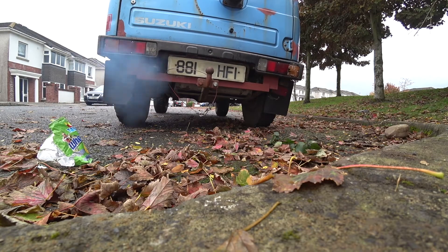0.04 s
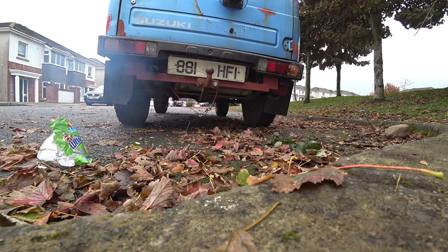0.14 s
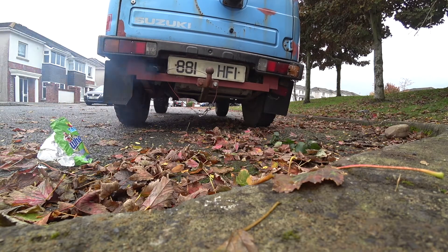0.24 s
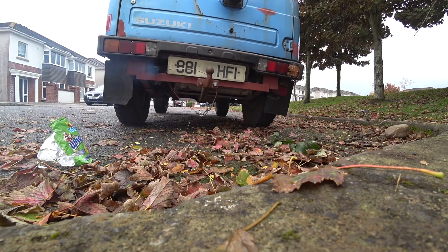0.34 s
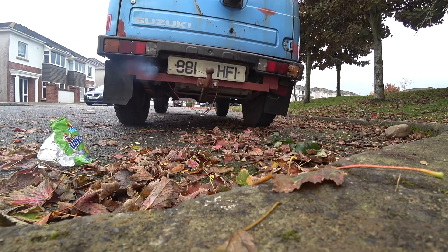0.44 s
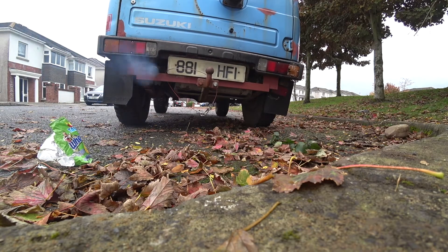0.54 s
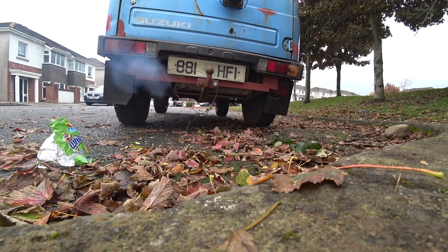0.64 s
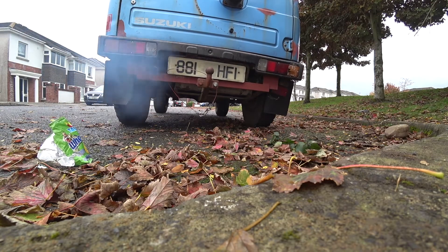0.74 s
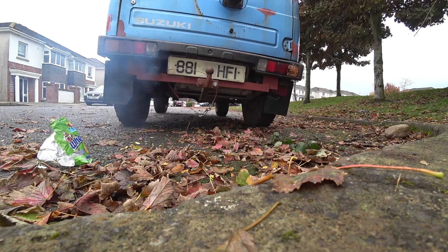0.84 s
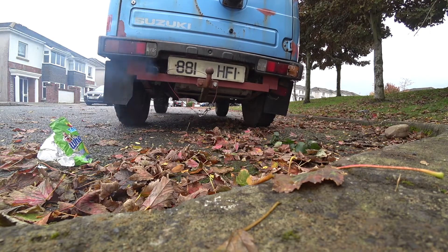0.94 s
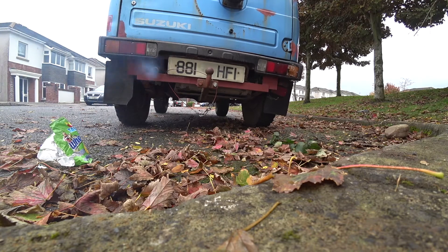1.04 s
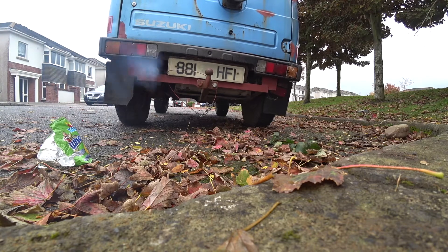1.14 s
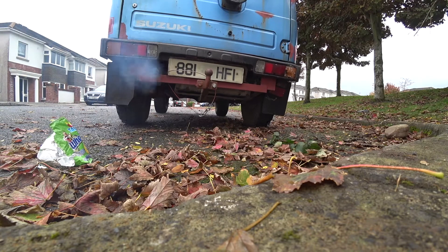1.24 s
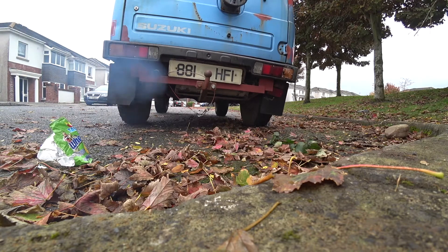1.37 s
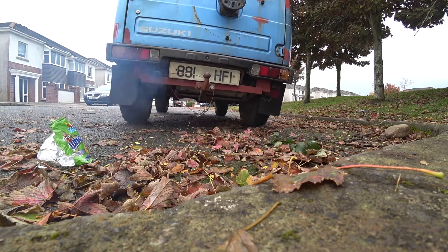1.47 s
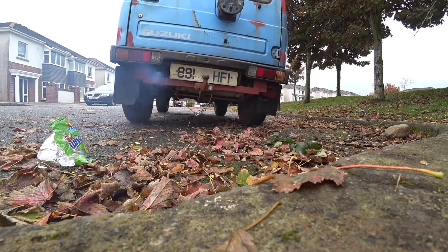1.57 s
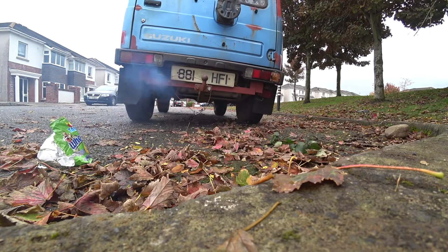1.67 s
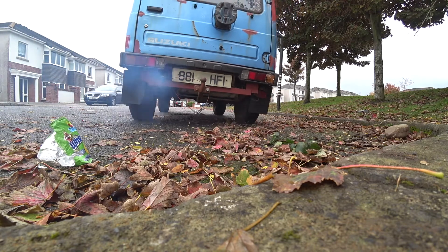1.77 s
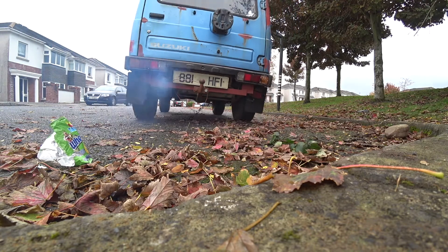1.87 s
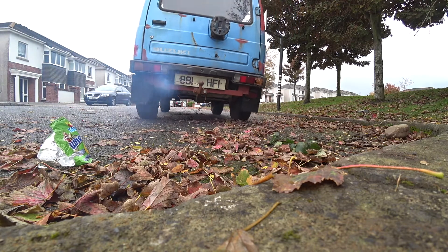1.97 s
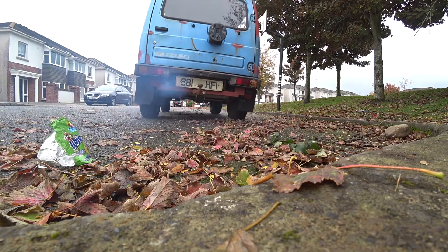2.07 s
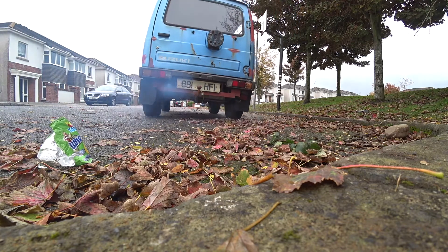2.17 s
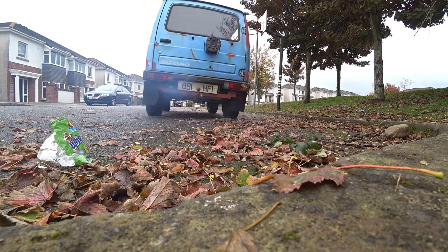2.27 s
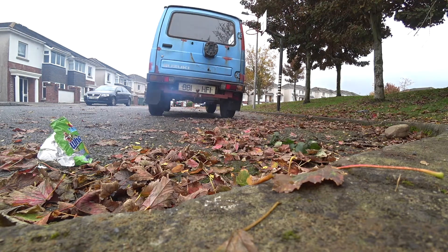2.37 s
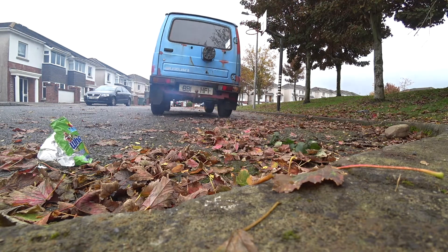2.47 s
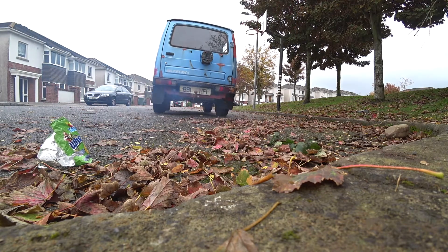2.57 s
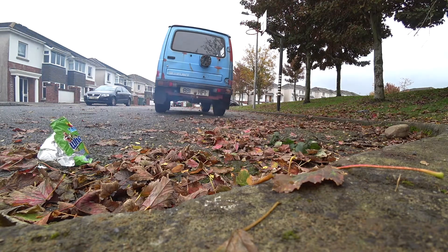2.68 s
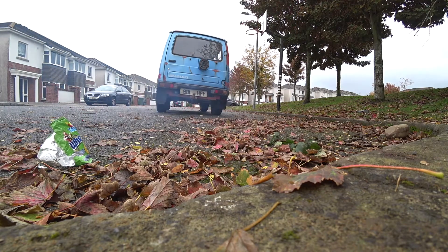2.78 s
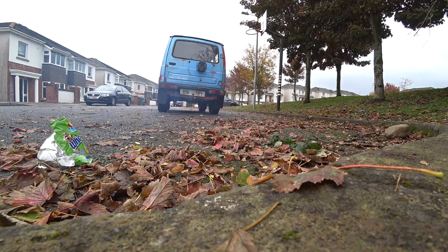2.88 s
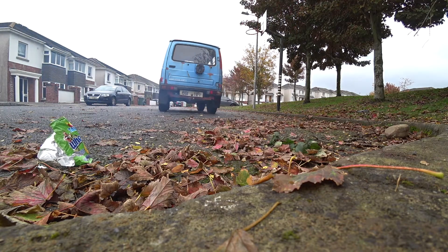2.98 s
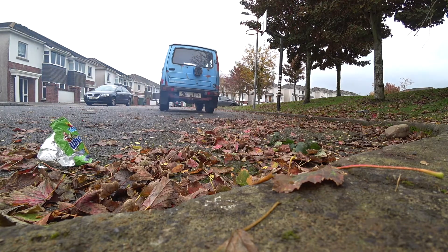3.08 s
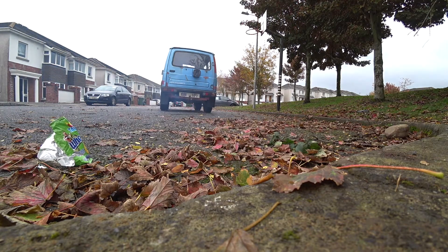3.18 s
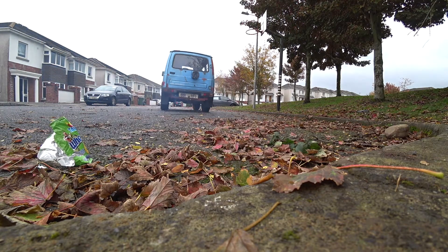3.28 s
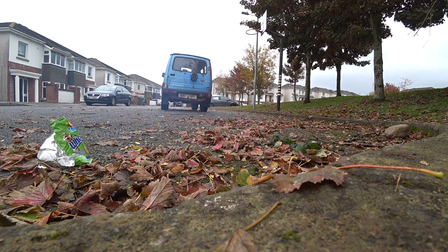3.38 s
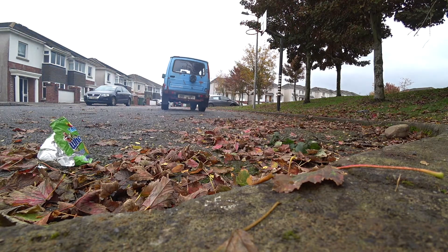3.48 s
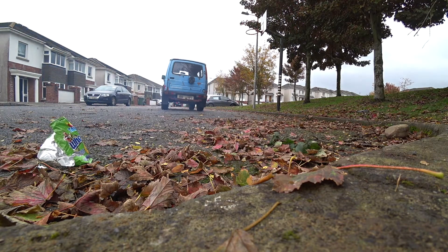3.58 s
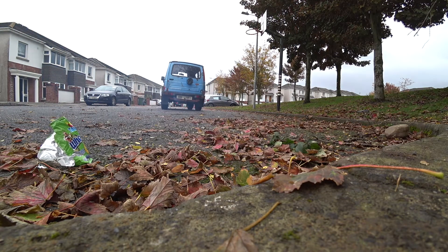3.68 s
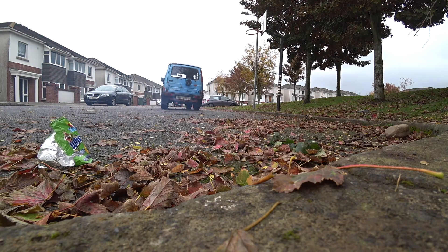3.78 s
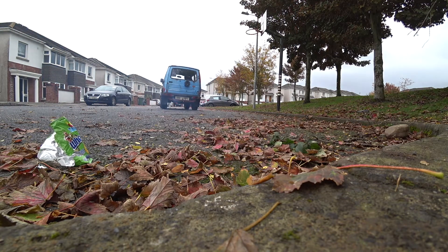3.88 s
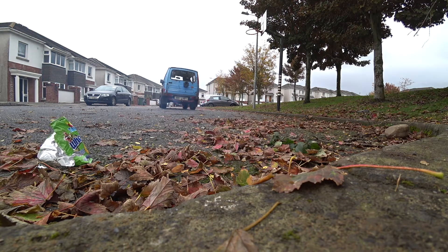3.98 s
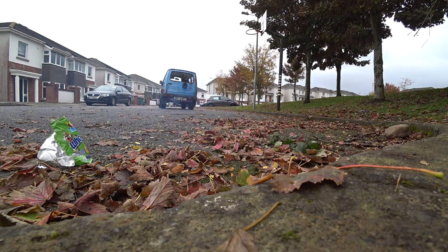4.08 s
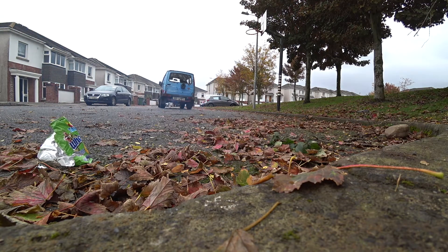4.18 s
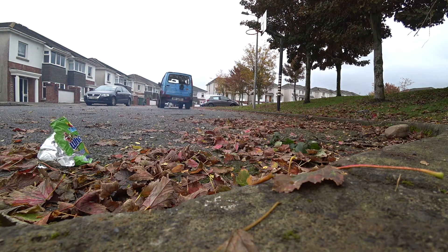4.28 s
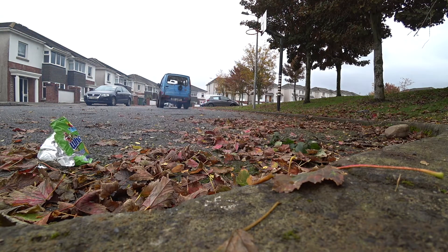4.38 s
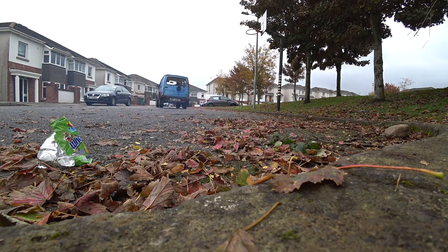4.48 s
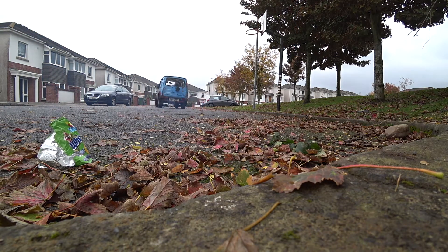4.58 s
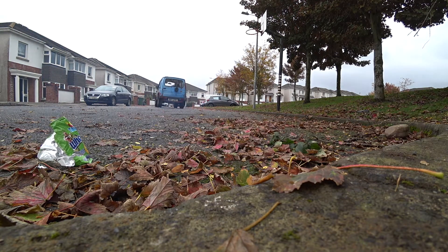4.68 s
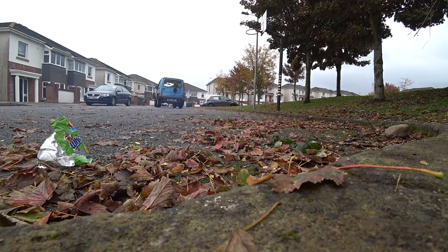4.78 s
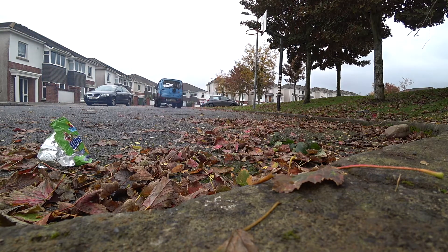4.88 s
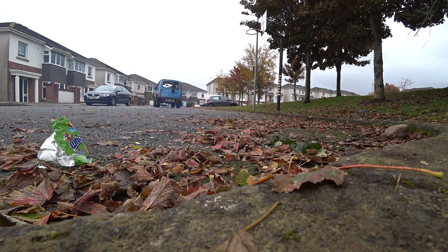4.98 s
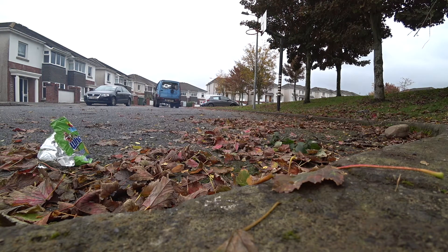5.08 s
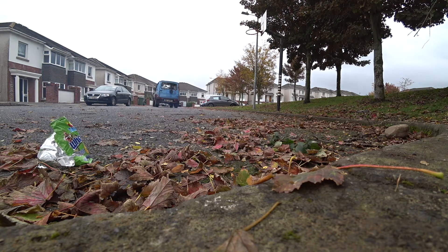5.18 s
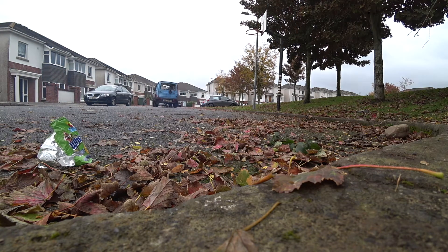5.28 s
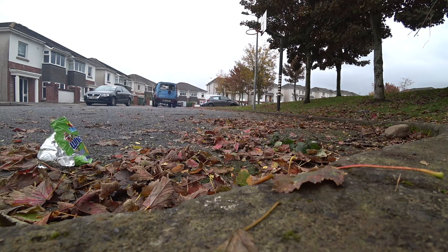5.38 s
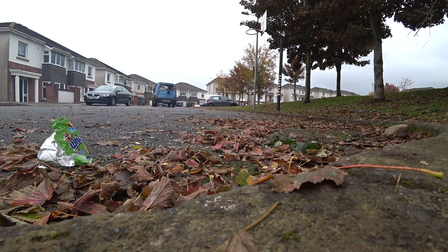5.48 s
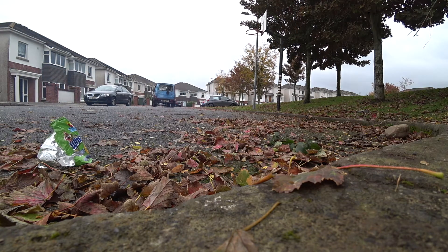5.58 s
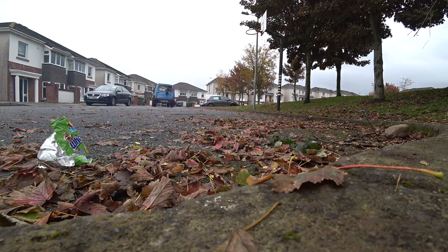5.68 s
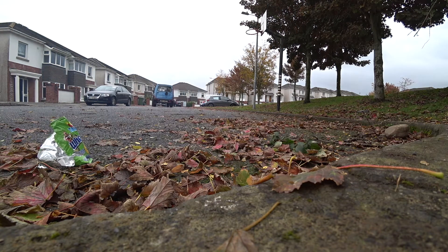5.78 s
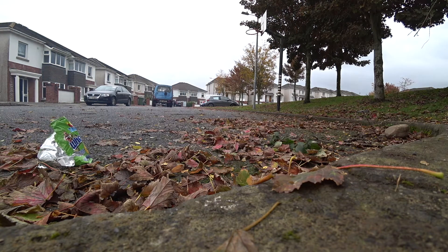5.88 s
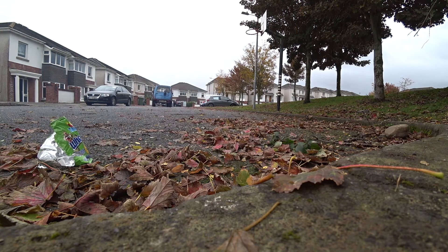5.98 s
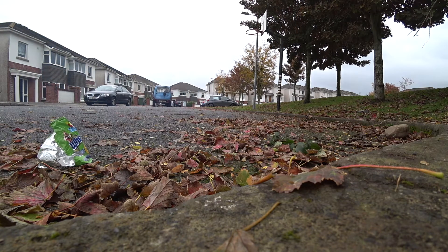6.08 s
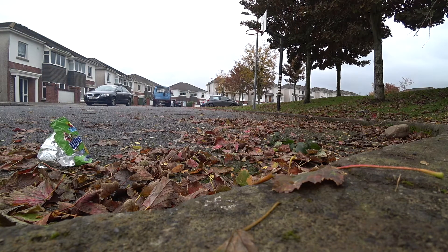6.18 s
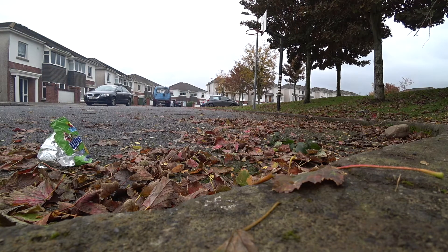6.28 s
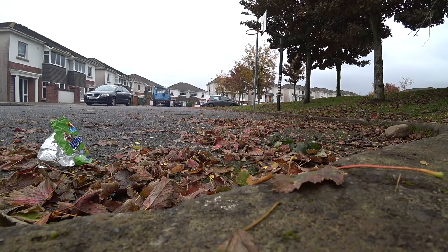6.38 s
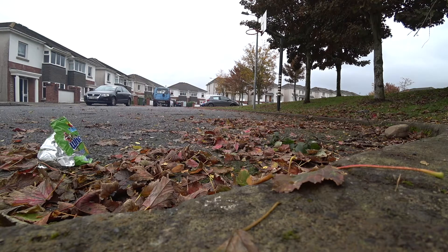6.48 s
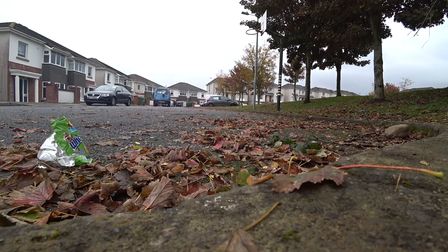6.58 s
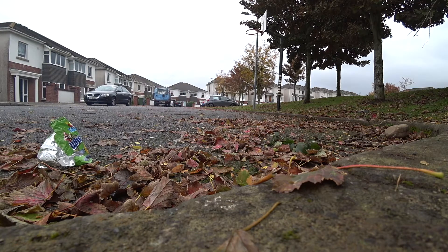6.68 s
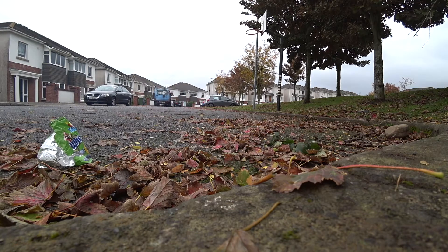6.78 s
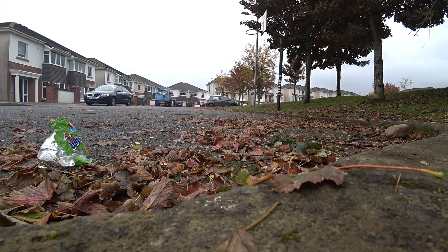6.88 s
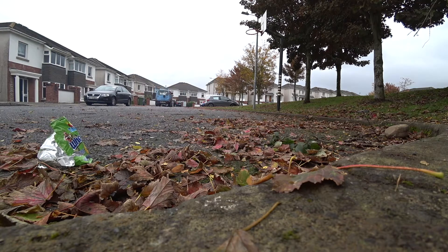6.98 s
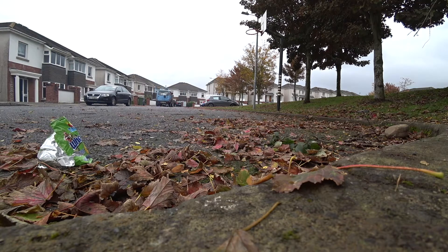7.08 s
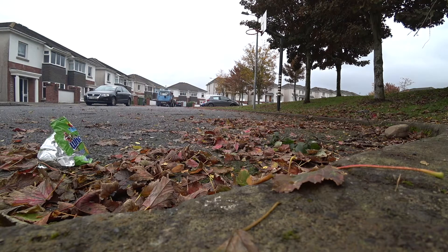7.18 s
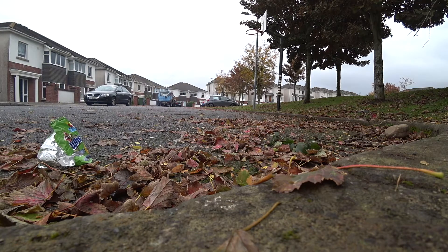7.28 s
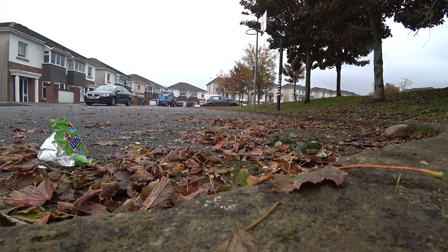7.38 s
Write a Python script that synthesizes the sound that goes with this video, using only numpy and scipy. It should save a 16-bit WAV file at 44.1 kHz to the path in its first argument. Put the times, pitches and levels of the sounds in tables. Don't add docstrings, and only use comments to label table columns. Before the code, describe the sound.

A rough little petrol engine throbs right in front of the microphone, revving in short bursts with gassy hiss and a light knock. Loose metal ticks and dry leaves crackle as it moves off. The sound quickly dulls with distance, pitch rises to a buzzy peak, falls at the shift, then hums away quietly with faint tyre hiss. Open street, low rumble, wind on the microphone.

```python
import sys
import numpy as np
from scipy import signal
from scipy.fft import rfft, irfft, next_fast_len
from scipy.io import wavfile
from scipy.ndimage import uniform_filter1d

SR = 44100
rng = np.random.default_rng(int(sys.argv[2]) if len(sys.argv) > 2 else 0)


def master(y):
    cut = np.clip(np.atleast_2d(y).T, -1, 1)
    pcm = np.round(cut * 32767)
    wavfile.write(sys.argv[1], SR, pcm.astype(np.int16))


def field_ratio(decibels):
    return 10 ** (np.asarray(decibels, dtype=float) / 20)


N = 328104

# pitch_hz, level_db (per Hz)
STREET_COLOUR = [(35, -17), (55, 12), (90, 10), (125, 12.5), (152, -4), (190, -34), (280, -6.5), (350, 0.5),
                 (500, -13), (900, -52.5)]
STREET_DB = -36.5

# start_s, end_s, level_db
GUSTS = [
    (0, .02, -28),
    (.28, .3, -37),
    (.8, .9, -42),
    (1.3, 1.8, -45),
    (2.46, 2.5, -40),
    (3.1, 3.2, -47),
    (3.7, 3.8, -46),
    (4.3, 4.35, -44),
    (5.2, 5.26, -38),
    (6.13, 7.44, -48),
]
GUST_DB_PER_S, CALM_DB = 70, -56
# pitch_hz, level_db (per Hz)
GUST_COLOUR = [(8, -33), (16, -2), (38, 20), (60, 3), (200, -47.0)]

# pitch_hz, leading_share, in_phase_share, unrelated_share
PORTS = [(60, 0.27, 0.073, .05), (150, 0.42, 0.089, 0.11), (350, 0.53, 0.14, 1), (790, 0.51, 0.077, 0.41),
         (1190, 0.22, 0.18, 0.39), (2500, 0.27, 0.074, 0.38), (5000, .12, 0.037, 0.32),
         (10000, .13, 0.016, 0.34)]
FULL_WIDTH_DB = -14

# start_s, peak_db
LEAVES = [
    (2.114, -26.5),
    (2.2692, -29),
    (2.458, -41),
    (2.4803, -24.5),
    (7.0544, -43),
]
# start_s, peak_db, pitch_hz
RATTLE = [(1.9928, -28, 4370), (2.055, -31, 3400), (2.0841, -26, 4100), (2.1016, -36, 3300),
          (2.1188, -24, 4460), (2.1817, -23, 4100), (2.2118, -31, 4590), (2.2303, -24.5, 4400),
          (2.296, -27, 4640), (2.365, -37, 4330), (2.6528, -31, 4140)]

# time_s, firing_hz
SPEED = [(0, 73.5), (.3, 77.3), (.6, 71), (1.3, 73.8), (1.78, 75.3), (2.04, 64.2), (2.3, 59.8),
         (2.785, 55.6), (3.0, 60.8), (3.33, 63.6), (3.6, 75), (4.2, 81.8), (5.1, 66.5), (5.44, 44.5),
         (5.75, 50), (6.3, 54), (7.1, 55.2), (7.44, 60)]
# peak_s, extra_hz, rise_s, fall_s
FLARES = [
    (.104, 13, .1, .045),
    (.754, 14, .14, .17),
    (.756, 4.5, .06, .015),
    (1.087, 4, .1, .1),
    (1.56, 3.4, .22, .2),
    (2.54, 1.5, .2, .1),
    (4.158, 6, .33, .04),
    (5.6, -1.5, .14, .03),
    (6.75, -1.3, .35, .12),
    (7.24, 1.6, .1, .12),
]
# start_s, end_s
OPEN = [
    (-1, .115),
    (.615, .765),
    (1.0, 4.15),
    (5.41, 9),
]
PEDAL_S = .04
GULP_DB, GULP_S = 5, 0.027
# time_s, gas_flow_db, pulse_strength_db, pulse_sharpness_db
FLOW = [(0, -26, -15.5, -4), (0.8, -27.0, -16, -8), (1.3, -27.0, -16.5, 1), (1.5, -26.0, -16.5, 7.2),
        (1.9, -28, -15.5, 0.5), (2.45, -27.5, -17.5, 2), (2.76, -31, -21, 11), (3, -30.5, -22, 0.5),
        (3.3, -29, -21, 3.8), (3.5, -26, -15.5, -1), (4.05, -28.5, -17, 1), (4.25, -32, -22.5, -17),
        (5.1, -35, -23, -6), (5.2, -35.5, -33.8, 6), (5.55, -38.5, -27.5, -21), (5.75, -33, -22.5, 4),
        (7, -33.5, -28, 10.5), (7.44, -31.5, -22, 0.5)]

# pitch_hz, level_db (per Hz)
HISS_COLOUR = [(880, -38), (1500, 0), (2210, -4.5), (2730, -7.5), (3280, -3), (3780, -1.5), (4260, -1.5),
               (5250, -4.5), (6270, -2.5), (7420, -4.5), (8560, -12), (10600, -11.5), (11200, -30),
               (14600, -52), (22000, -120)]
HISS_DB = -11.5
HISS_EDGES_HZ = [300, 2800, 5300, 7800, 14000]
DULLING = [-0.11, 0.14, 0.22, 0.81]
# time_s, level_db
CLEAR = [(0, 4), (2.55, 3.5), (3.2, -24), (3.5, -15), (4.2, -14), (5.6, -11), (6.3, -9.5), (6.9, -10),
         (7.44, -10)]
ROAD_FROM_S, ROAD_DB_PER_S = 6.77, 6

# pitch_hz, level_db (per Hz)
ROAR_COLOUR = [(700, -10.5), (1080, 5.0), (1200, 6.5), (1350, 0.5), (2000, -18)]
ROAR_LOADED_DB, ROAR_OVERRUN_DB = -12, -15

# start_s, end_s, level_db
RASP = [
    (3.6, 4.08, -45),
]
RASP_DB_PER_S, RASP_REST_DB = 33, -70
# pitch_hz, level_db (per Hz)
RASP_COLOUR = [(1000, -33), (1400, -3), (2000, -1), (2600, -24)]

# pitch_hz, level_db (per Hz)
RUMBLE_COLOUR = [(26, -48), (45, -8), (86, -4), (122, -67), (153, 10.5), (214, -12.5), (259, -3),
                 (395, -10.5), (692, -9), (753, -16.5), (863, -11), (1060, -22), (2600, -29), (3380, -48),
                 (5720, -120)]

# pitch_hz, level_db, t60_s
BLOCK = [(2120, -1, .02), (2280, 0, .025), (3280, -10, .015), (4230, -4, .04), (4400, -11, .02)]
# start_s, end_s, level_db
KNOCKS = [
    (0, .1, -39),
    (.63, .74, -38),
    (1.3, 1.72, -41),
    (3.42, 4.08, -48),
]
KNOCK_REST_DB, KNOCK_DB_PER_S = -58, 300

# pitch_hz, width_hz, level_db
PIPE = [(356, 21, -13), (429, 70, -9.5), (519, 41, -11.5), (599.5, 28.4, -10), (701.6, 19, -12.5),
        (790, 63, -14.5), (878, 78, -16.5)]
UPPER_LOADED_DB, UPPER_OVERRUN_DB = -3, 0
UPPER_SHARE, GULP_SHARPENS = 0.2, 4.4
BRIGHTER_DB_PER_HZ, BRIGHTER_FROM_HZ = .3, 63

# pitch_hz, width_hz, level_db
LOW_PIPE = [(83.6, 21.9, -2.5), (110.9, 17.6, -5.5), (158.7, 21.5, 0.26), (275.7, 56, -8.0), (393, 92, -14)]
LOW_CUT_HZ, OVERRUN_CUT_HZ, LOW_CUT_SLOPE = 58.7, 52, 29
# pitch_hz, width_hz
NOTCHES = [(219.4, 23), (315.0, 50)]
ORDER_PHASE = [0.0, 0.3, 0.8, 2.0, 4.0]
ORDER_LOADED_DB = [1.3, -0.96, -0.87, -3, -9.5]
ORDER_OVERRUN_DB = [1.9, -5.5, -1.5, -7.5, -11]
ORDER_DB_PER_S = [.1, 0.32, -0.12, -0.74, 0.57]
LEAVES_AT_S = 1.8
SHARP_SHARE = [0, 0, 0.44, 0.5, 0.79]
# centre_s, level_db, spread_s
STUMBLES = [(.17, 2, 0.035), (.23, -8, 0.0099), (.33, 0, 0.018), (.55, 1, 0.027), (.8, 2, .03),
            (.88, -2.5, 0.024), (4.15, -4, 0.017), (4.79, -4.5, 0.038), (5.33, 1.5, 0.077),
            (5.64, 4.5, 0.031), (6.1, 1, .15)]


def seconds():
    return np.arange(N) / SR


def rms_one(x):
    return x / np.sqrt(np.mean(x ** 2) + 1e-20)


def in_time(rows):
    s, *columns = np.transpose(rows)
    return [np.interp(seconds(), s, c) for c in columns]


def at_hz(points, hz, column=1):
    points = np.array(points)
    return np.interp(np.log(hz), np.log(points[:, 0]), points[:, column])


def spans(rows, db_per_s, rest_db):
    t = seconds()
    levels = [np.full(N, rest_db)]
    for start, end, db in rows:
        outside = np.maximum(0, np.maximum(start - t, t - end))
        levels.append(db - db_per_s * outside)
    return np.max(levels, axis=0)


def drift(rate):
    r = np.exp(-80 * np.pi * rate / SR)
    slow = signal.lfilter([1], [1, -2 * r, r * r], rng.standard_normal(N // 40 + 2002))[2000:]
    return np.interp(np.arange(N) / 40, np.arange(len(slow)), rms_one(slow))


def ring(clicks, hz, t60):
    r, w = field_ratio(-60 / (t60 * SR)), 2 * np.pi * hz / SR
    return signal.lfilter([0, np.sin(w)], [1, -2 * r * np.cos(w), r * r], clicks + 1e-18)


def coloured(spectrum):
    size = next_fast_len(N)
    hz = np.maximum(np.fft.rfftfreq(size, 1 / SR), 1)
    shaped = rfft(rng.standard_normal((2, size))) * field_ratio(at_hz(spectrum, hz))
    return rms_one(irfft(shaped, size)[:, :N])


def street():
    return field_ratio(STREET_DB + 1.5 * drift(3.7)) * coloured(STREET_COLOUR)


def gusts():
    level_db = spans(GUSTS, GUST_DB_PER_S, CALM_DB) + 2.3 * drift(8)
    return field_ratio(level_db) * coloured(GUST_COLOUR)[0]


def ports(mid, diffuse):
    size = next_fast_len(N)
    hz = np.maximum(np.fft.rfftfreq(size, 1 / SR), 1)
    loudness = np.sqrt(uniform_filter1d(mid ** 2, size=6000)) / field_ratio(FULL_WIDTH_DB)
    width = loudness ** 1.16
    bass = np.clip(600 / hz, 0, 1) ** 3.3
    turned = rfft(mid, size) * (1j * at_hz(PORTS, hz) + at_hz(PORTS, hz, column=2))
    turned += rfft(diffuse, size) * at_hz(PORTS, hz, column=3)
    side = width * irfft(turned * bass, size)[:N] + irfft(turned * (1 - bass), size)[:N]
    return np.array([mid + side, mid - side])


def leaf_snaps():
    clicks = np.zeros(N)
    for s, db in LEAVES:
        clicks[round(s * SR)] = field_ratio(db + 5.0)
    dying = signal.lfilter([1], [1, -np.exp(-1 / (.005 * SR))], clicks)
    body = signal.butter(1, [900, 3800], "band", fs=SR, output="sos")
    return dying * signal.sosfilt(body, rng.standard_normal(N))


def shield_ticks():
    out = np.zeros(N)
    after = np.arange(800) / SR
    for s, db, hz in RATTLE:
        modes = hz * rng.uniform(.85, 1.13, (5, 1))
        cluster = np.sin(2 * np.pi * modes * after).sum(axis=0)
        out[round(s * SR):][:800] += field_ratio(db - 15 - 60 * after / 0.061) * cluster
    return out


def revs():
    t = seconds()
    rate = in_time(SPEED)[0]
    for s, hz, rise, fall in FLARES:
        rate = rate + hz * np.clip(1 + (t - s) / rise, 0, 1) * np.exp(-np.maximum(t - s, 0) / fall)
    return uniform_filter1d(rate, size=700)


def pedal():
    t = seconds()
    throttle, gulp_db = np.zeros(N), np.zeros(N)
    for start, end in OPEN:
        pressed = np.clip((t - start) / PEDAL_S + .5, 0, 1)
        throttle += pressed * np.clip((end - t) / PEDAL_S + .5, 0, 1)
    for start, _ in OPEN[:-1]:
        gulp_db += GULP_DB * (t >= start) * np.exp(-np.abs(t - max(start, 0)) / GULP_S)
    return throttle, uniform_filter1d(gulp_db, size=1000)


def by_load(throttle, loaded, overrun):
    return throttle * loaded + (1 - throttle) * overrun


def puffs(turn, depth_db, uneven_db):
    cycle, since = np.divmod(turn / (2 * np.pi), 1)
    chance = np.clip(rng.standard_normal(int(cycle[-1]) + 1), -2, 2)
    strength_db = depth_db + uneven_db * chance[cycle.astype(int)]
    return rms_one(field_ratio(uniform_filter1d(strength_db * np.exp(-3.0 * since), size=30)))


def hiss(turn, rumble_db):
    white = [coloured(HISS_COLOUR), coloured(HISS_COLOUR)]
    dull_db = in_time(CLEAR)[0]
    out = 0
    for k in range(4):
        band_pass = signal.butter(2, HISS_EDGES_HZ[k:k + 2], "band", fs=SR, output="sos")
        flicker_db = 1.0 * drift(16.6) + 0.32 * drift(0.96)
        out = out + signal.sosfilt(band_pass, white[k % 2]) * field_ratio(flicker_db + dull_db * DULLING[k])
    level_db = rumble_db + HISS_DB + ROAD_DB_PER_S * np.maximum(seconds() - ROAD_FROM_S, 0)
    return field_ratio(level_db) * puffs(turn, depth_db=5.0, uneven_db=1.5) * out


def roar(throttle, flow_db):
    return field_ratio(flow_db + by_load(throttle, ROAR_LOADED_DB, ROAR_OVERRUN_DB)) * coloured(ROAR_COLOUR)


def rasp(turn):
    level = field_ratio(spans(RASP, RASP_DB_PER_S, RASP_REST_DB))
    return level * coloured(RASP_COLOUR) * puffs(turn, depth_db=2.0, uneven_db=3.0)


def rumble(turn, rumble_db):
    level = field_ratio(rumble_db - 1.0 + 1.0 * drift(5.2))
    return level * coloured(RUMBLE_COLOUR) * puffs(turn, depth_db=-11.0, uneven_db=3.0)


def knock(turn):
    at = np.flatnonzero(np.diff((turn / (2 * np.pi) + .35).astype(int)))
    strength_db = -6 * (np.arange(len(at)) % 2) + rng.normal(0, 2.5, len(at))
    out = np.zeros(N)
    for hz, level_db, t60 in BLOCK:
        clicks = np.zeros(N)
        clicks[at] = field_ratio(level_db + strength_db + rng.normal(0, 2, len(at)))
        out += ring(clicks, hz, t60)
    return field_ratio(spans(KNOCKS, KNOCK_DB_PER_S, KNOCK_REST_DB)) * rms_one(out)


def upper_orders(turn, per_s, upper_db):
    out = np.zeros(N)
    for k in range(6, 17):
        gain = sum(field_ratio(db) / (1 + (2 * (k * per_s - hz) / width) ** 2) for hz, width, db in PIPE)
        phase = .15 * drift(4) + rng.uniform(0, 2 * np.pi)
        out += gain * field_ratio(upper_db + 1.2 * drift(4)) * np.cos(k * turn + phase)
    return out


def low_pipe(order_hz, throttle):
    gain = np.abs(sum(field_ratio(db) / (1 + 2j * (order_hz - hz) / width) for hz, width, db in LOW_PIPE))
    cut_hz = OVERRUN_CUT_HZ + throttle * (LOW_CUT_HZ - OVERRUN_CUT_HZ)
    gain = gain / np.sqrt(1 + (cut_hz / order_hz) ** LOW_CUT_SLOPE)
    for hz, width in NOTCHES:
        gain = gain * np.sqrt(1 - .97 / (1 + (2 * (order_hz - hz) / width) ** 2))
    return gain


def low_orders(turn, per_s, throttle, pulse_db, sharp_db):
    out, t = np.zeros(N), seconds()
    for s, db, spread in STUMBLES:
        pulse_db = pulse_db + db * np.exp(-((t - s) / spread) ** 2 / 2)
    away_s = np.maximum(t - LEAVES_AT_S, 0)
    for i in range(5):
        k = i + 1
        db = pulse_db + ORDER_DB_PER_S[i] * away_s + SHARP_SHARE[i] * sharp_db
        db = db + by_load(throttle, ORDER_LOADED_DB[i], ORDER_OVERRUN_DB[i])
        db = db + .45 * np.sqrt(k) * drift(10)
        phase = ORDER_PHASE[i] + np.pi * throttle * (i % 2)
        out += np.sqrt(2) * low_pipe(k * per_s, throttle) * field_ratio(db) * np.cos(k * turn + phase)
    return out


def scene():
    per_s = revs()
    throttle, gulp_db = pedal()
    flow_db, pulse_db, sharp_db = in_time(FLOW)
    turn = 2 * np.pi * np.cumsum(per_s) / SR
    rumble_db = flow_db + gulp_db
    brighter_db = throttle * BRIGHTER_DB_PER_HZ * np.maximum(per_s - BRIGHTER_FROM_HZ, 0)
    upper_db = rumble_db + UPPER_SHARE * sharp_db + brighter_db
    upper_db = upper_db + by_load(throttle, UPPER_LOADED_DB, UPPER_OVERRUN_DB)

    noise = street() + hiss(turn, rumble_db) + roar(throttle, flow_db) + rasp(turn) + rumble(turn, rumble_db)
    engine = knock(turn) + upper_orders(turn, per_s, upper_db)
    engine += low_orders(turn, per_s, throttle, pulse_db, sharp_db + GULP_SHARPENS * gulp_db)
    mid = engine + noise[0] + leaf_snaps() + shield_ticks() + gusts()
    return ports(mid, diffuse=noise[1])


def top_cut(x):
    return signal.sosfilt(signal.butter(12, 11060, fs=SR, output="sos"), x)


def record(dry):
    return top_cut(dry)


dry = scene()
out = record(dry)
master(out)
```